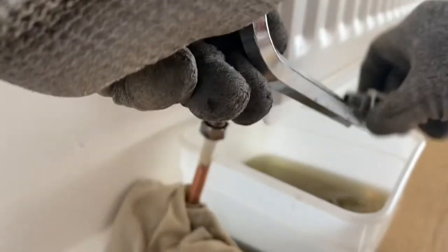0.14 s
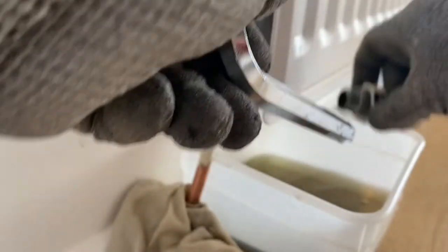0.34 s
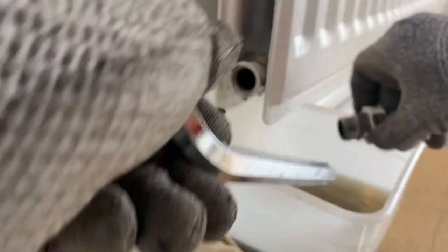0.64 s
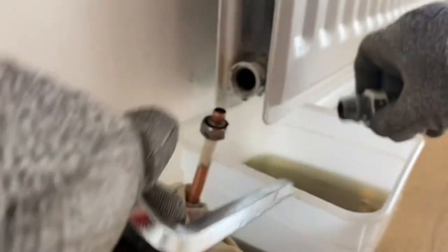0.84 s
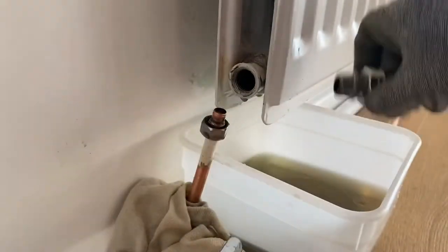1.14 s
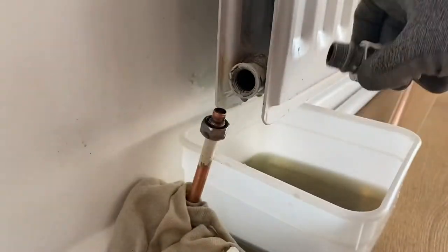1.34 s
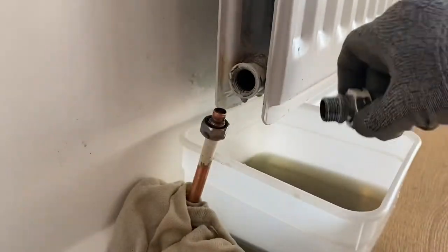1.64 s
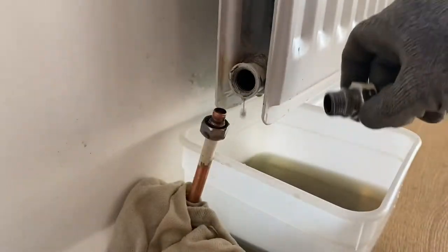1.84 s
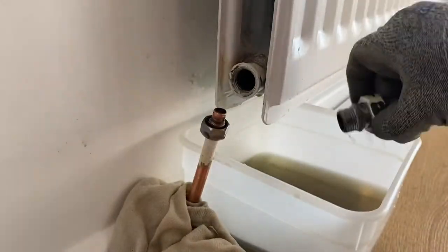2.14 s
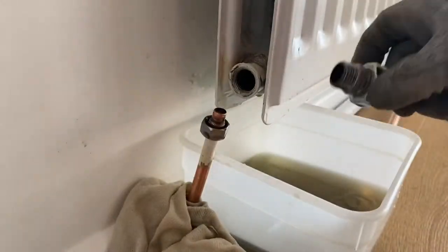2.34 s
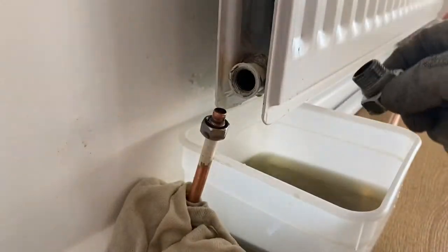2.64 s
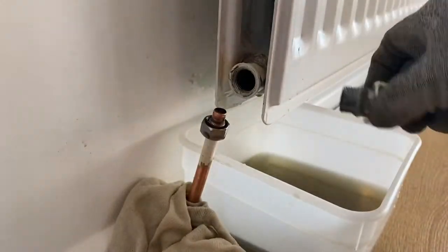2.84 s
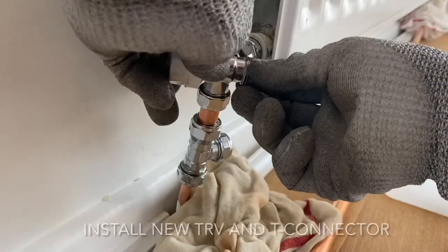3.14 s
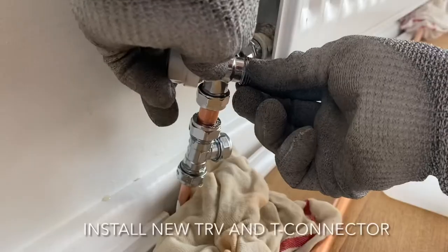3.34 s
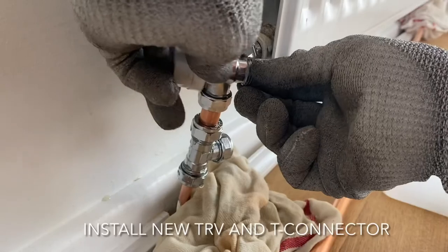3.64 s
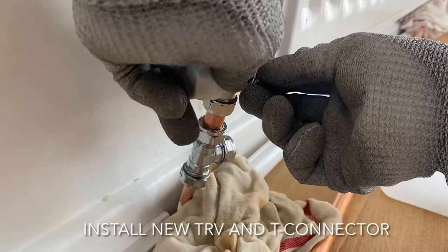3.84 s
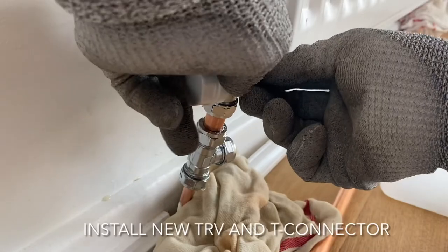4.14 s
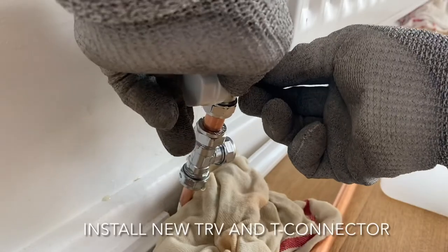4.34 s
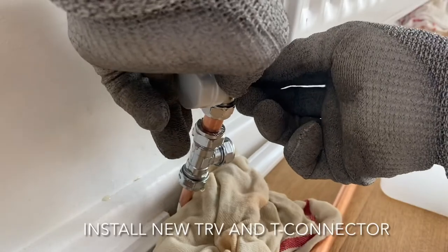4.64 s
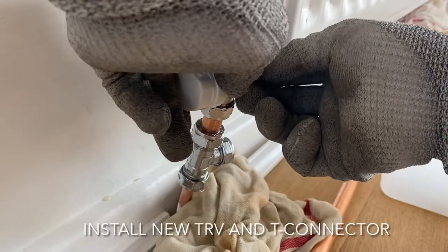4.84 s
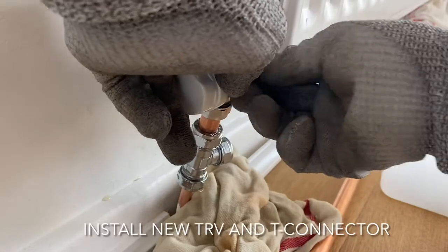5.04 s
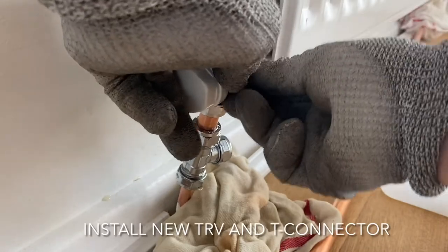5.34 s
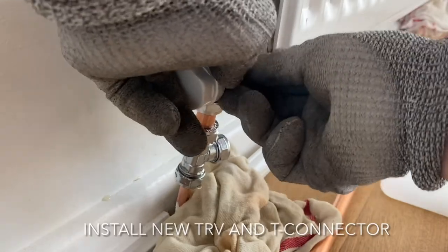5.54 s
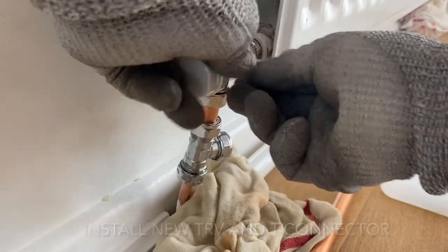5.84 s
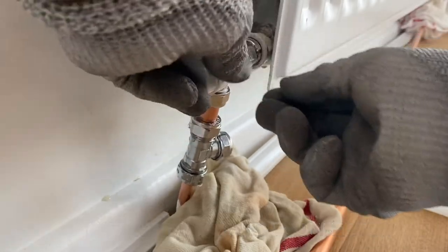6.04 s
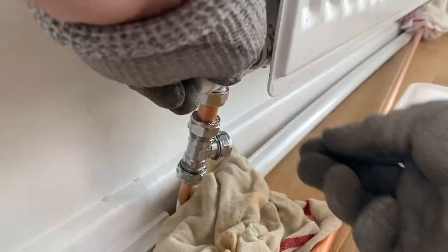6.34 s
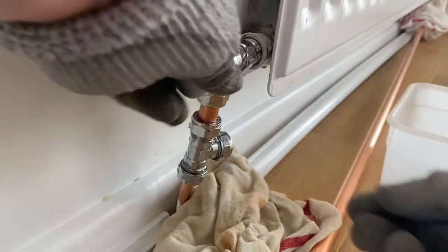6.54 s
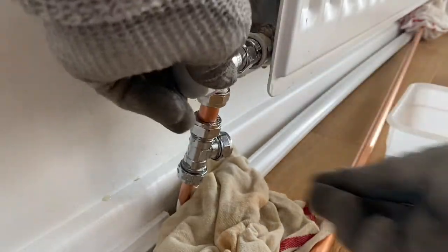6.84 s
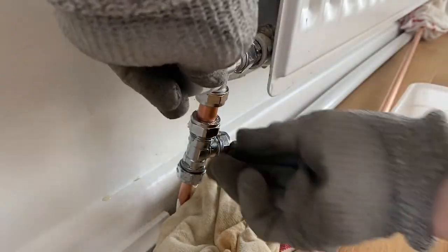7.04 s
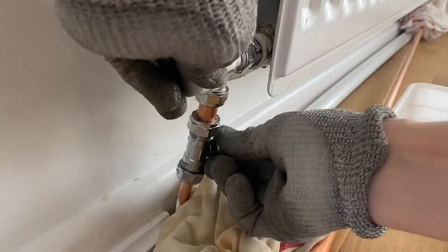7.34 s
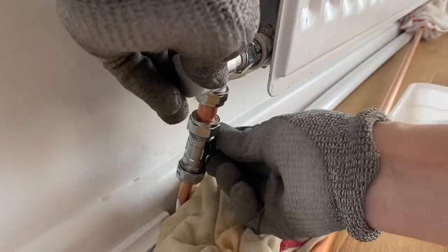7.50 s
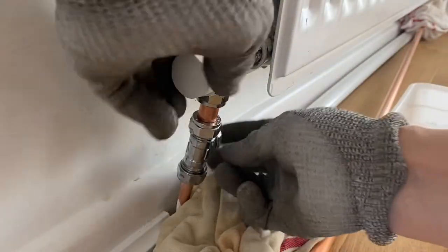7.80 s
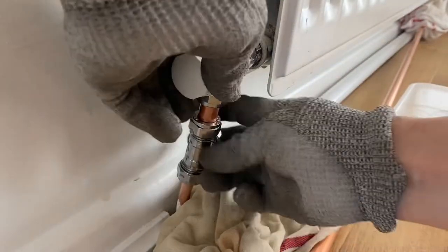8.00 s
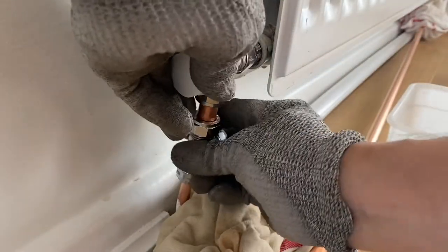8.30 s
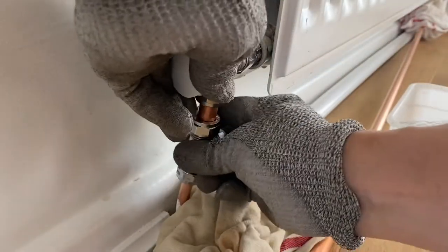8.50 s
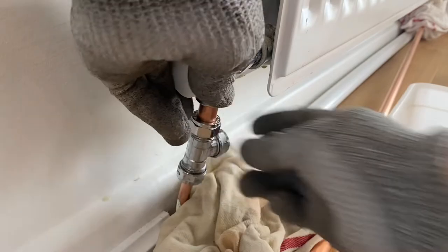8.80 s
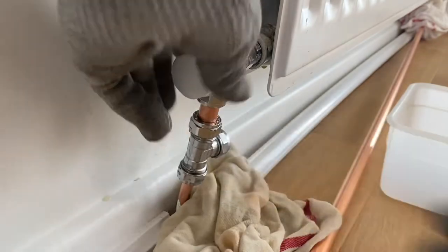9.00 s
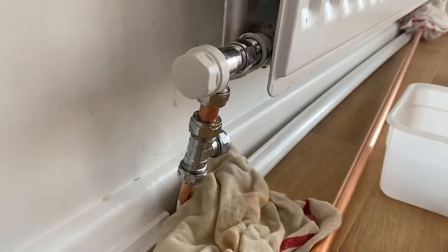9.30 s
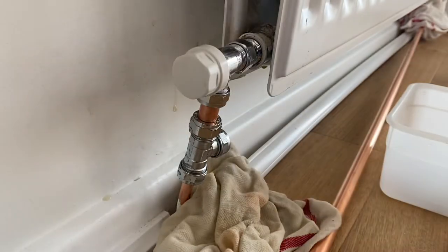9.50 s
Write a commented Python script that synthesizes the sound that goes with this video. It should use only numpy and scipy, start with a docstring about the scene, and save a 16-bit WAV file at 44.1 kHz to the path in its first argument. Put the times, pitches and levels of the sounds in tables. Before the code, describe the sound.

Gloved hands clink a spanner on a brass fitting, drop a tool with a thud, then knock a valve onto a radiator pipe.

```python
"""A small room with a wooden floor, close up on gloved hands fitting a valve to a panel radiator.
Over a low room hum, knitted gloves brush past, and short pitched creaks and ticks dot the handling.
A key clinks on a brass fitting, and a tool is put down on the boards with a thud. Then the valve is
worked onto its copper pipe: knocks and scrapes ring the steel panel, and each knock sways the pipe."""
import sys
import numpy as np
from scipy import signal
from scipy.fft import rfft, irfft, next_fast_len
from scipy.io import wavfile

SR = 44100
rng = np.random.default_rng(int(sys.argv[2]) if len(sys.argv) > 2 else 0)


def wav_out(sig):
    """Save sig, one row per channel (or a flat mono array), as 16-bit PCM at SR to the path in sys.argv[1]."""
    wavfile.write(sys.argv[1], SR, np.round(np.clip(np.atleast_2d(sig).T, -1, 1) * 32767).astype(np.int16))


N = 426006
TIME = np.arange(N) / SR
TAIL = TIME[:SR]  # one second for a hit to ring out

# room tone: (frequency [Hz], level [dB])
HUM_COLOUR = [(30, -20.5), (55, -1.5), (69, 9), (88, 0.5), (130, 1), (160, -3.5), (205, 2), (280, -8.5),
              (420, -17), (560, -10.5), (900, -21.5), (1500, -26), (3000, -38.5), (7000, -47),
              (15000, -45.5)]
# the small room's reverb: (frequency [Hz], t60 [s])
ROOM_DECAY = [(200, .33), (2000, .3), (4000, .27), (7000, .31), (15000, .27)]
# centred bass, wide mids, two out-of-phase treble bands: (frequency [Hz], correlation [-1 to 1])
LEFT_RIGHT_CORRELATION = [(60, .98), (130, .93), (290, .6), (640, 0), (1400, .3), (3500, .45), (7800, .4),
                          (8700, -.85), (9500, -.85), (10200, .5), (12300, .5), (13200, -.7), (14500, .5)]
# the pipe with the radiator hanging on it: (frequency [Hz], level [dB], t60 [s])
SWAY_MODES = [(69, -0.5, 1.4), (76.3, -6, 0.62), (140, -15, 0.9)]

# a glove or sleeve slides past: (peak time [s], length [s], level [dB])
GLOVE_STROKES = [(0.733, 0.016, -50), (0.759, 0.067, -53), (0.976, 0.24, -49.5), (1.105, 0.074, -59.5),
                 (1.469, 0.33, -57.5), (1.844, .15, -69.5), (5.527, 0.11, -66), (6.522, 0.23, -69),
                 (6.941, 0.19, -66.5), (8.069, 0.12, -67.5), (8.982, 0.18, -58.5), (9.335, 0.33, -61),
                 (9.606, 0.22, -55.5)]
# soft brushing hiss: (frequency [Hz], level [dB])
HISS_COLOUR = [(300, 0), (1200, -7.5), (2000, 0.5), (4000, -3.5), (7000, -4), (9300, -13), (11500, -6.5),
               (15500, -16.5)]
# short pitched creaks and ticks: (peak time [s], length [s], level [dB], resonance [Hz])
CREAKS_AND_TICKS = [(0.423, 0.0065, -52.5, 2600), (1.106, 0.047, -53, 1690), (1.437, 0.018, -43.5, 2030),
                    (1.438, 0.016, -37, 5470), (1.52, 0.0061, -38.5, 1870), (2.294, 0.32, -74, 2880),
                    (2.455, 0.011, -60, 3150), (2.718, 0.012, -43, 3750), (2.922, 0.0085, -60, 3180),
                    (3.094, 0.029, -50, 1310), (3.602, 0.028, -46, 1210), (3.674, 0.046, -51.5, 1010),
                    (3.963, .025, -42.5, 1290), (5.155, 0.058, -51, 2450), (6.546, 0.039, -44, 1510),
                    (6.939, 0.043, -54.5, 1650), (7.542, 0.073, -66.5, 1520), (8.196, 0.008, -44.5, 1557),
                    (9.283, 0.0094, -49, 920), (9.54, 0.012, -54.5, 1600), (9.561, 0.0059, -46, 3220)]
# tone of a creak: (frequency [multiple of the resonance], level [dB])
CREAK_COLOUR = [(.25, -27.5), (.65, -12), (.9, 2), (1.1, 0.5), (1.5, -12.5), (7, -61)]

# loose parts ring on: (time [s], frequency [Hz], level [dB], t60 [s], left-right phase [rad])
LOOSE_PINGS = [(1.9902, 4190, -43.5, .4, .8), (5.752, 4660, -29, .13, .8), (8.646, 8750, -34, .14, 2.6)]
# key meets fitting: (time [s], level [dB], hardness [0 flat side to 1 sharp edge])
KEY_CLINKS = [(0.231, -48.5, 0.15), (0.274, -50.5, .04), (0.3044, -37, 0.28), (0.33, -39.5, 0.11),
              (0.3394, -38, .2), (0.4653, -38, 0.71), (0.4714, -28, 0.86), (0.5413, -39.5, 0.75),
              (0.5782, -39, 0.81), (0.591, -50, .4), (0.82, -44.5, 0.28), (1.026, -53, 0.54),
              (1.362, -38.5, 0.38), (1.3762, -29.5, 0.88), (1.434, -32, 0.39), (1.519, -39, 0.39),
              (1.607, -48.5, 0.72), (1.653, -39, 0.35), (1.664, -36, 0.32), (2.049, -52, 0.61),
              (2.068, -33, 0.3), (2.428, -44.5, 0.44), (2.487, -53, .07), (2.712, -38.5, 0.17),
              (2.7339, -28.5, 0.26), (2.7433, -28, 0.95), (2.779, -38.5, 0.46), (2.891, -47.5, 0.21),
              (2.943, -62, 0.27)]
# the brass fitting, damped by the glove: (frequency [Hz], level [dB], t60 [s])
FITTING_MODES = [(1900, -15, .01), (3400, -1, .011), (3850, 4.5, .016), (5200, -5, .008), (6800, 4, .013),
                 (7100, 3.5, .015), (11200, -2, .007), (11900, -4, .006), (14770, 2.5, .05)]
# the fitting's ring groups: (level [dB] at hardness 0, at 0.5, at 1)
LOW_RING_DB, MID_RING_DB, TOP_RING_DB = (4, -14.5, -27.5), (-18.5, 1.5, -6), (-28.5, -27.5, 9.5)
# the tool on the floor: (frequency [Hz], level [dB], t60 [s])
TOOL_MODES = [(180, -6.5, 0.099), (284.4, -6.5, 0.34), (704.5, -1.5, 0.079), (1070, -11.5, 0.15),
              (1613, -20.5, 0.17), (2844, -17, 0.21)]
# body of the floorboards: (frequency [Hz], level [dB])
BOARD_COLOUR = [(40, -31.5), (120, -2), (280, -1), (750, -2), (1100, -9.5), (1700, -15.5), (2700, -22),
                (4500, -26), (8000, -42.5), (15000, -50.5)]

# brass on the radiator: (time [s], level [dB], hardness tilt [dB/octave], hand weight [dB], edge [dB])
VALVE_KNOCKS = [(1.438, -57.5, 16, 11, -4.5), (2.983, -55, -6, -4, 1.5), (3.127, -44.5, -7.5, 5.5, 8.5),
                (3.627, -47, -4, 0.5, 5), (3.951, -36.5, -14, -11.5, 10.5), (4.13, -55.5, -1, 10.5, -0.5),
                (4.253, -22.5, 1.5, -5.5, -2.5), (4.512, -49.5, 4, -3, -4.5), (4.546, -22.5, 3.5, -5, -3.5),
                (4.791, -26, -3.5, -5, -1), (4.986, -22, -1, -3, 0.5), (5.203, -40, -6.5, 4, 1.5),
                (5.576, -24.5, 4, -7, -1), (5.624, -32, 3.5, -2.5, 2), (5.75, -30.5, 7.5, -2, 2.5),
                (6.112, -49, 6.5, 21.5, -4.5), (6.531, -35.5, -13, -8, 7.5), (6.932, -58, -4.5, 12.5, -1.5),
                (7.036, -63, -1, 16, -1), (7.795, -53.5, -23, 7, -2.5), (8.162, -50.5, -8.5, -1.5, -5),
                (8.193, -57, 2.5, 11, -3), (8.415, -53, 0.5, 1.5, -17), (8.496, -52, 6.5, -12, -10),
                (8.646, -41.5, 12, -3.5, -7), (8.722, -50, 8, -5, -8), (8.988, -39.5, -10.5, -3, 3),
                (9.281, -70, 10, 21.5, 4.5)]
# a nut or the valve drags over its seat: (start [s], length [s], level [dB], treble tilt [dB/octave])
VALVE_SCRAPES = [(3.116, 0.029, -51.5, 6), (3.19, 0.023, -53, 2), (3.297, 0.02, -56.5, 0.5),
                 (3.687, 0.048, -42.5, 3), (3.848, 0.011, -61, 4.5), (4.526, 0.013, -39.5, -10.5),
                 (5.236, 0.023, -53.5, 0.5), (5.538, .016, -35.5, -8), (5.734, 0.014, -41.5, 10.5),
                 (6.024, 0.029, -48, -13.5)]
# rasp of a scrape: (frequency [Hz], level [dB])
RASP_COLOUR = [(500, -0.5), (1500, 1.5), (4000, 6), (7000, -11), (10000, -23.5)]
# clear notes of pipe and steel panel: (frequency [Hz], level [dB], t60 [s])
PANEL_MODES = [(186.2, -10, 0.77), (318, -3.5, .22), (431.2, -10, 0.38), (626, -3.5, .28), (844, -7, 0.47),
               (937, -6.5, 0.34), (1080, -6.5, .3), (1166, -4, .22), (1270, -3, 0.16), (1325, 8, .2),
               (1477, -2, .26), (1712, 2.5, .25), (2030, -6.5, 0.15), (2366, -7.5, 0.29),
               (2478, -2.5, 0.21), (2670, -6, .16), (3353, -6, .16), (3448, -5, 0.12)]
# wash of the panel's countless higher-order modes: (frequency [Hz], level [dB])
PANEL_COLOUR = [(25, -10.5), (60, 2.5), (120, -1), (300, -4), (900, -1), (1400, 5.5), (2400, -6.5),
                (3400, -12), (4500, -18.5), (7000, -22.5), (10000, -31), (15000, -39.5)]
# tail of that wash: (frequency [Hz], t60 [s])
PANEL_DECAY = [(60, 1), (160, 0.79), (420, .24), (1100, 0.38), (2900, 0.32), (8000, 0.25)]
# the valve's own snap: (frequency [Hz], t60 [s])
SNAP_DECAY = [(1500, .05), (5000, 0.04), (9000, 0.065), (15000, 0.028)]
# base tone of every valve contact: (frequency [Hz], level [dB])
CONTACT_COLOUR = [(70, 2.5), (300, 4.5), (550, 6.5), (850, 4.5), (1250, -2.5), (2700, 0), (4500, 3),
                  (6500, 0), (9000, -2), (15000, -9)]
# the hand's weight lifts the low end: (frequency [Hz], lift [dB per dB of weight])
WEIGHT_LIFT = [(70, 1), (130, 1), (300, 0.99), (550, 0.5148), (1250, 0)]
# the edge's bite lifts the top: (frequency [Hz], lift [dB per dB of edge])
EDGE_LIFT = [(2700, 0), (4500, 1.83), (6500, 2)]

CONTACT_SCATTER_DB = 4.5  # variation from hit to hit
SLIP_S = 0.011  # the slide that leads into a knock


def undb(db):
    """Decibels to gain."""
    return 10 ** (np.asarray(db) / 20)


def at(points, hz):
    """Read (frequency, value) points on a log-frequency axis."""
    freqs, values = np.transpose(points)
    return np.interp(np.log(hz + 1), np.log(freqs), values)


def colour(x, points):
    """Minimum-phase EQ along a (frequency [Hz], level [dB]) curve, so attacks stay sharp."""
    size = 2 * next_fast_len(x.shape[-1] // 2 + 2048)
    gain = undb(at(points, np.arange(size // 2 + 1) * SR / size))
    cepstrum = irfft(np.log(gain))
    cepstrum[1:size // 2] *= 2
    cepstrum[size // 2 + 1:] = 0
    return irfft(rfft(x, size) * np.exp(rfft(cepstrum)))[..., :x.shape[-1]]


def unit(x, span_s=None):
    """Scale to rms 1, over the whole sound or its first span_s."""
    return x / np.sqrt(np.mean(x[..., :int(span_s * SR) if span_s else None] ** 2))


def noise(size):
    """Stereo noise with centred bass, wide mids and two out-of-phase treble bands."""
    mid, side = rfft(rng.standard_normal((2, size)))
    correlation = np.clip(at(LEFT_RIGHT_CORRELATION, np.arange(len(mid)) * SR / size), -.99, .99)
    mid, side = mid * np.sqrt(1 + correlation), side * np.sqrt(1 - correlation)
    return irfft(np.array([mid + side, mid - side]), size)


def fade(t60):
    """Free decay, 60 dB in t60 seconds."""
    return np.exp(-np.log(1000) * TAIL / t60)


def wash(t60s):
    """Modes too dense to count: noise that dies at its own rate in each band."""
    hz, times, bands = signal.stft(noise(SR), SR, nperseg=256)
    decay = np.exp(-np.log(1000) * times / at(t60s, hz)[:, None])
    return signal.istft(bands * decay, SR)[1][:, :SR]


def ringing(modes):
    """One decaying complex oscillation for each mode."""
    rings = [undb(db) * fade(t60) * np.exp(2j * np.pi * hz * TAIL) for hz, db, t60 in modes]
    return np.array(rings, np.complex64)


def strike(modes, rings, scatter_db):
    """Each contact point mixes the modes anew; a left-right phase offset gives each its width."""
    size, phase, lag = rng.standard_normal((len(modes), 3)).T
    correlation = np.clip(at(LEFT_RIGHT_CORRELATION, np.array(modes)[:, 0]), -1, 1)
    apart = np.arccos(correlation) * np.sign(lag) / 2
    phases = np.pi * phase + np.array([apart, -apart])
    weights = undb(scatter_db * np.tanh(size)) * np.exp(1j * phases)
    return (weights.astype(np.complex64) @ rings).imag


def add(out, s, sound):
    """Mix a sound in at time s."""
    start = int(s * SR)
    out[:, start:start + sound.shape[1]] += sound[:, :N - start]


def repeat(sound, times, dbs):
    """Retrigger one small sound at many times and levels."""
    starts = np.maximum(times * SR, 0).astype(int)
    taps = np.bincount(starts, weights=undb(dbs))
    return signal.fftconvolve(taps[None], sound, axes=1)


def walk(turns_per_s):
    """Random drift with a spread near 1."""
    knots = np.arange(0, TIME[-1] + 1, 1 / turns_per_s)
    return np.interp(TIME, knots, rng.standard_normal(len(knots)))


def catches(size, per_s, spread_db):
    """Crackle: sparse tiny impulses, a few much stronger than the rest."""
    chance, strength = rng.random(size), rng.exponential(size=size)
    return (chance < per_s / SR) * undb(spread_db * np.minimum(strength, 3))


def room(x, wet_db, near_db, near_t60):
    """Reverb: the wall and panel close by answer at once, the rest of the room follows."""
    far = wash(ROOM_DECAY) * np.minimum(TAIL / 0.0037, 1)
    near = noise(SR) * fade(near_t60)
    echo = (undb(wet_db) * unit(far) + undb(near_db) * unit(near)) / np.sqrt(SR)
    return x + signal.fftconvolve(x, echo, axes=1)[:, :N]


def room_hum(level_db=-55):
    """The bed: a steady, bass-heavy hush."""
    return unit(colour(noise(N), HUM_COLOUR)) * undb(level_db)


def pipe_sway(gain_db=-16, rise_s=0.04, db_per_push_db=0.67):
    """Each knock sets the pipe and hanging radiator swaying, a low bloom under the hit."""
    out = np.zeros((2, N))
    rings = ringing(SWAY_MODES) * (1 - np.exp(-(TAIL / rise_s) ** 2))
    for s, db, _, weight_db, _ in VALVE_KNOCKS:
        swing = undb(gain_db + db_per_push_db * (db + weight_db))
        add(out, s, swing * strike(SWAY_MODES, rings, scatter_db=0))
    return out


def gloves(fidget_db=-86, rise_share=.42, grain_db=1, flutter_db=2.16, snag_db=-10):
    """Knitted fabric brushes past in strokes, its threads snagging and letting go with small ticks."""
    speed = undb(fidget_db + 3.5 * walk(4))  # the fingers never quite rest
    for s, length, db in GLOVE_STROKES:
        width = length * np.where(TIME < s, rise_share, 1 - rise_share)
        speed += undb(db) * np.exp(-((TIME - s) / width) ** 2)
    grain = noise(N) * undb(grain_db * walk(400))
    brush = unit(colour(grain, HISS_COLOUR)) * undb(flutter_db * walk(34))
    release = signal.fftconvolve(catches(N, per_s=70, spread_db=4), fade(0.011))[:N]
    snag_colour = [(500, -13), (1700, -1.5), (3000, 0), (7000, -11.5), (15000, -18.5)]
    snags = unit(colour(noise(N) * release, snag_colour))
    return speed * (brush + undb(snag_db) * snags)


def creaks_and_ticks():
    """Short pitched bursts of grainy noise: finger rubs, a key scrape, the hollow ring after knocks."""
    out, size = np.zeros((2, N)), SR // 2
    centre_s = size / SR / 2
    for s, length, db, hz in CREAKS_AND_TICKS:
        envelope = np.exp(-(2 * (TAIL[:size] - centre_s) / length) ** 2)
        grains = noise(size) * (catches(size, per_s=1500, spread_db=3) + 0.12)
        creak = colour(grains, [(ratio * hz, level) for ratio, level in CREAK_COLOUR])
        add(out, s - centre_s, undb(db) * envelope * unit(creak))
    return room(out, wet_db=-7, near_db=-6, near_t60=0.067)


def pings():
    """A tool or a nut that is not held tight rings on with one clear note."""
    out = np.zeros((2, N))
    for s, hz, db, t60, apart in LOOSE_PINGS:
        note = np.sin(2 * np.pi * hz * TAIL + np.array([[apart], [0]]))
        add(out, s, undb(db) * fade(t60) * note)
    return out


def clink(hardness, grip_detune=.04, crack_db=-10, crack_t60=0.024, attack_s=0.00013):
    """A gritty crack and clusters of damped brass rings; harder contact brings higher rings forward."""
    cluster = np.repeat(FITTING_MODES, 3, axis=0)
    hz = cluster[:, 0]
    low_db, mid_db, top_db = (np.interp(hardness, [0, .5, 1], ring)
                              for ring in (LOW_RING_DB, MID_RING_DB, TOP_RING_DB))
    ring_db = np.select([hz > 13000, (hz > 2500) & (hz < 4600)], [top_db, low_db], mid_db)
    touch = undb(ring_db) / np.sqrt(3)
    # the changing grip splits the low modes most
    detune = 1 + grip_detune * rng.standard_normal(len(hz)) * np.minimum(4000 / hz, 1) ** 2
    modes = np.column_stack([hz * detune, cluster[:, 1:]])
    crack_colour = [(150, -1.5), (1000, 0), (2300, 10.5), (7000, 6), (11000, -8), (15000, -10.5)]
    crack = unit(colour(noise(SR) * fade(crack_t60), crack_colour), 0.0033)
    brass = strike(modes, ringing(modes) * touch[:, None], CONTACT_SCATTER_DB)
    attack = 1 - np.exp(-TAIL / attack_s)
    return (brass + undb(crack_db + max(mid_db, low_db)) * crack) * attack


def key_clinks(gain_db=5.5, left_db=0.8, rattle_s=0.027, graze_s=0.0034, rattle_db=-24.5):
    """Key and fitting clink in the hand, with four tiny grazes or bounces around each contact."""
    out = np.zeros((2, N))
    for s, db, hardness in KEY_CLINKS:
        add(out, s, undb(db) * clink(hardness))
    times, dbs, _ = np.repeat(KEY_CLINKS, 4, axis=0).T
    late, size = rng.standard_normal((len(times), 2)).T
    bounce_times = times + rattle_s * np.abs(late) - graze_s
    bounce_dbs = dbs + rattle_db + CONTACT_SCATTER_DB * size
    add(out, 0, repeat(clink(hardness=.3), bounce_times, bounce_dbs))
    out *= undb([[gain_db + left_db], [gain_db - left_db]])
    return room(out, wet_db=-11, near_db=-7, near_t60=0.023)


def tool_thud(time_s=1.9902, start_hz=1150, end_hz=290, sweep_s=.0019, swell_s=.0023):
    """A tool lands on the boards; bending waves carry the highs ahead, so the pulse falls in pitch."""
    hz = end_hz + (start_hz - end_hz) * np.exp(-TAIL / sweep_s)
    envelope = TAIL / swell_s * np.exp(1 - TAIL / swell_s)
    pulse = np.sin(2 * np.pi * np.cumsum(hz) / SR) * envelope
    boards = unit(colour(noise(SR) * fade(0.32), BOARD_COLOUR), 0.059)
    tick_colour = [(500, -10), (1500, 10.5), (4500, -2.5), (8000, -12.5), (15000, -28.5)]
    tick = unit(colour(noise(SR) * fade(0.016), tick_colour), 0.0043)
    ring = unit(strike(TOOL_MODES, ringing(TOOL_MODES), scatter_db=1), 0.04)
    punch = undb([[-2.3], [-5.3]]) * pulse  # a little to the left
    out = np.zeros((2, N))
    add(out, time_s, punch + undb(-27.5) * boards + undb(-31) * ring + undb(-30) * tick)
    return out


def knock(rings, db, tilt_db, weight_db, edge_db, modes_db,
          wash_db=-4, slip_db=-14, rise_s=0.00097, rebound_s=.011, rebound_db=-8, pivot_hz=1450):
    """The valve slips, seats and rebounds: the blow spreads through the panel and rings its modes."""
    body = unit(colour(wash(PANEL_DECAY), PANEL_COLOUR), .04)
    notes = unit(strike(PANEL_MODES, rings, CONTACT_SCATTER_DB), .04)
    snap_colour = [(300, -16), (1200, -7), (2600, -8.5), (4500, -15), (15000, -27)]
    snap = unit(colour(wash(SNAP_DECAY), snap_colour), 0.0032)
    # a light tap hardly moves the panel, so the valve's own snap stands out
    snap_db = np.interp(db, [-55, -30], [-1, -7])
    cushion = undb(0.38 * max(weight_db, 0))  # a heavy gloved hand lengthens the push
    swell = 1 - np.exp(-TAIL / (rise_s * cushion))
    hit = (undb(wash_db) * body + undb(modes_db) * notes) * swell + undb(snap_db) * snap / cushion
    # the loose valve drops back on its seat
    hit = repeat(hit, np.array([0, rebound_s * (.5 + rng.random())]), [0, rebound_db])
    lead = int(SLIP_S * SR)
    slip = undb(slip_db) * body[:, :lead] * np.linspace(0, 1, lead) ** 2
    tone = []
    for hz, base_db in CONTACT_COLOUR:
        bright_db = tilt_db * max(np.log2(hz / pivot_hz), 0) + edge_db * at(EDGE_LIFT, hz)
        tone.append((hz, base_db + bright_db + weight_db * at(WEIGHT_LIFT, hz)))
    return undb(db) * colour(np.hstack([slip, hit]), tone)


def scrape(rings, length, db, tilt_db, slips_per_s=220, scatter_db=3, swell_db=3.5):
    """Metal drags over its seat: a quick, uneven run of tiny knocks, biting harder towards the end."""
    count = max(int(length * slips_per_s), 1)
    late, size = rng.standard_normal((512, 2))[:count].T
    times = length * (np.arange(count) + np.tanh(late) / 2 + .5) / count
    dbs = scatter_db * size + swell_db * times / length
    grain = colour(knock(rings, db, tilt_db, weight_db=2, edge_db=1.5, modes_db=-7), RASP_COLOUR)
    return repeat(grain, times, dbs) / np.sqrt(np.sum(undb(dbs) ** 2))


def radiator(left_db=0.4):
    """The steel panel is the soundboard for every knock and scrape of the valve."""
    out, rings = np.zeros((2, N)), ringing(PANEL_MODES)
    for s, db, tilt_db, weight_db, edge_db in VALVE_KNOCKS:
        add(out, s - SLIP_S, knock(rings, db, tilt_db, weight_db, edge_db, modes_db=-4))
    for s, length, db, tilt_db in VALVE_SCRAPES:
        add(out, s - SLIP_S, scrape(rings, length, db, tilt_db))
    return out * undb([[left_db], [-left_db]])


def scene():
    """The mix: hardware up front, small details and low end underneath."""
    hardware = key_clinks() + tool_thud() + pings() + radiator()
    return hardware + creaks_and_ticks() + gloves() + room_hum() + pipe_sway()


def record(dry):
    """A steep low-pass takes off the air above 16.3 kHz."""
    return signal.sosfilt(signal.ellip(8, .2, 70, 16300, fs=SR, output="sos"), dry)


dry = scene()
out = record(dry)
wav_out(out)
```